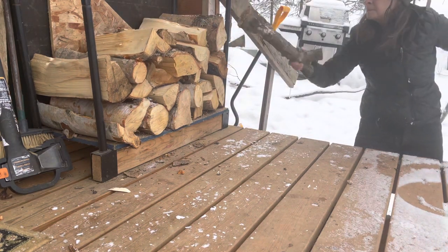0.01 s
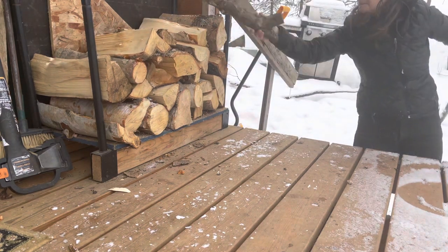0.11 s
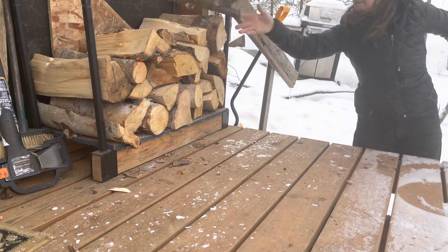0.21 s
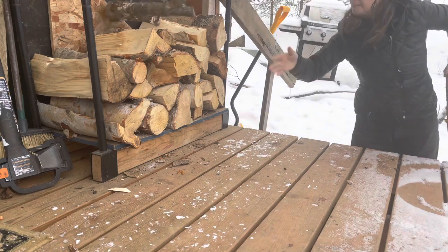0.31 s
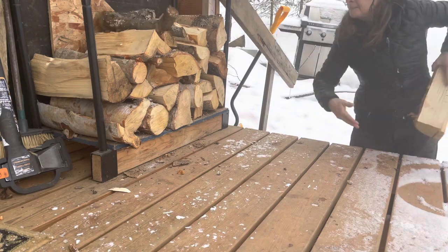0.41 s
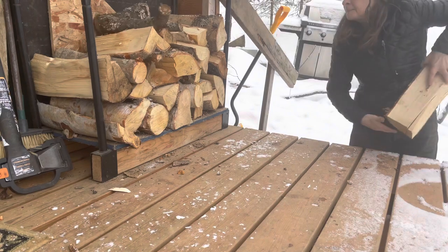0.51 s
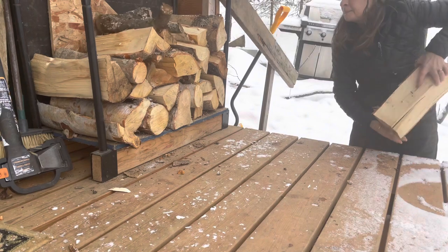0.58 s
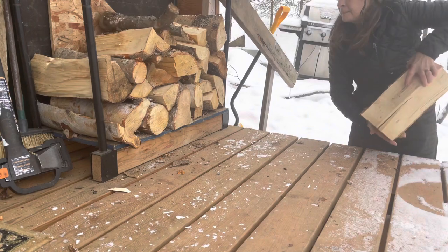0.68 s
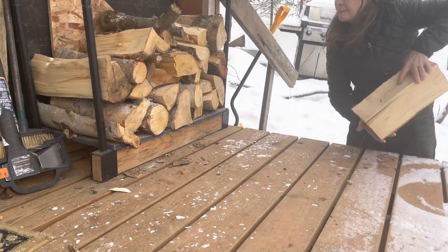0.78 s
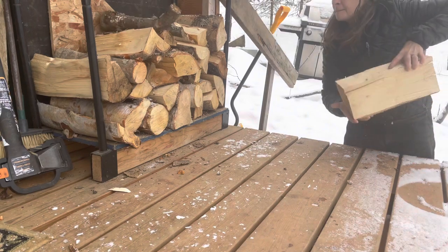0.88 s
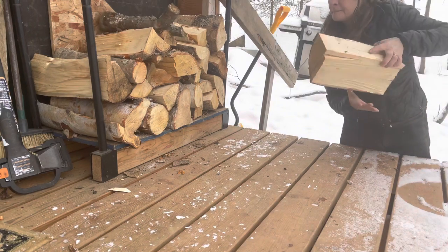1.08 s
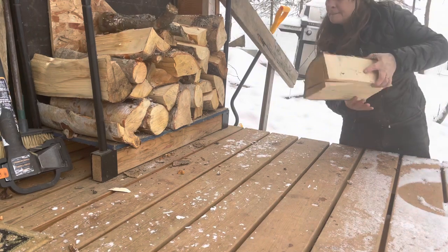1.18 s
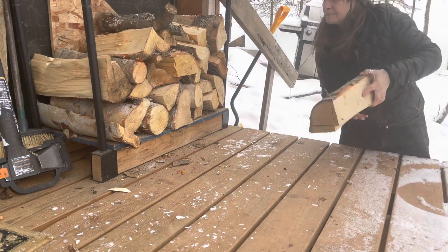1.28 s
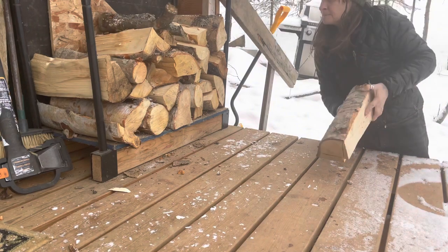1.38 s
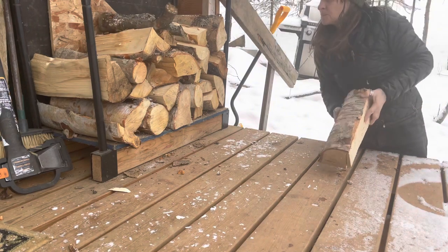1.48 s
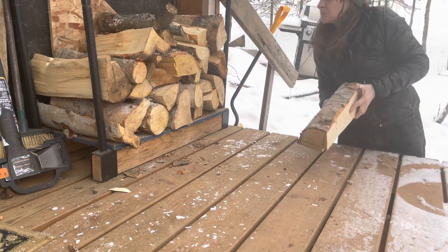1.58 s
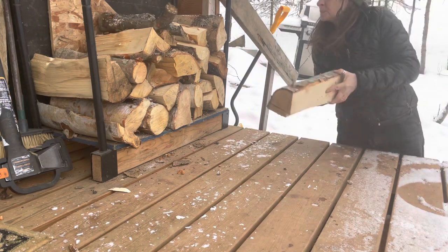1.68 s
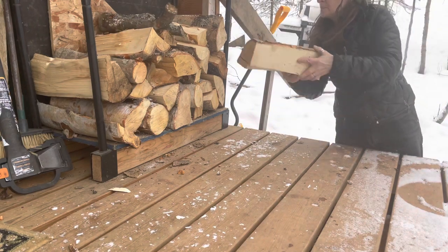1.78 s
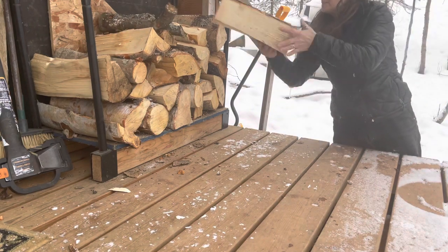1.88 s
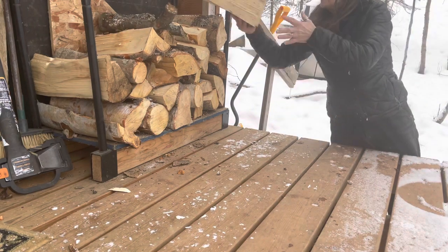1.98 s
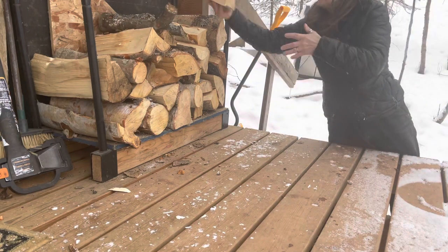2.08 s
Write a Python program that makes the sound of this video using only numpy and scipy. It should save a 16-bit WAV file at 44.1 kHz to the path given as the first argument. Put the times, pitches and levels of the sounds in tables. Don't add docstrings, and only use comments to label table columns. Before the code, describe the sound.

A tossed log grazes bark and lands on a firewood stack with a deep wooden knock, rocks with low booms and crumbs, then a split log slaps into a hand; jacket rustles, quiet snowy yard, close stereo microphone.

```python
import sys
import numpy as np
from scipy import signal
from scipy.fft import rfft, irfft
from scipy.io import wavfile
from scipy.ndimage import uniform_filter1d

SR = 44100
rng = np.random.default_rng(int(sys.argv[2]) if len(sys.argv) > 2 else 0)


def store_pcm(level_fs):
    pcm = np.round(np.clip(level_fs, -1, 1) * 32767).astype(np.int16)
    wavfile.write(sys.argv[1], SR, np.atleast_2d(pcm).T)


def rack_gain(trim_db):
    fader = np.asarray(trim_db, float)
    return 10 ** (fader / 20)


N = 92610
CLOCK = np.arange(N) / SR
LAND_S = 0.2046
SWELL_CYCLES = 0.77

# pitch_hz, density_db (dB per Hz)
SNAP_COLOUR = [(500, -8.5), (1400, -7), (2540, -9.5), (5000, -12), (8300, -8), (10000, -5.5),
               (11200, -21.5), (12600, -52)]


def evened(x):
    return x / np.sqrt(np.mean(x ** 2) + 1e-20)


def read(points, hz):
    f, value = np.transpose(points)
    return np.interp(np.log(hz + 1), np.log(f + 1), value)


def add(mix, s, sound):
    part = mix[round(s * SR):][:len(sound)]
    part += sound[:len(part)]


def bell(s, half_s):
    return np.exp(-.5 * ((CLOCK - s) / half_s) ** 2)


def noise(spectrum, size, patchy_db=0.):
    z = signal.stft(rng.standard_normal(size + 1024), nperseg=512)[2]
    patches = uniform_filter1d(rng.standard_normal(z.shape), size=8, axis=0)
    patches = evened(uniform_filter1d(patches, size=8, axis=1))
    colour_db = read(spectrum, np.fft.rfftfreq(512, 1 / SR))[:, None]
    z = z * rack_gain(colour_db + patchy_db * patches)
    return evened(signal.istft(z, nperseg=512)[1][512:512 + size])


def narrow(hz, wide):
    return [(hz / wide, -24), (hz, 0), (hz * wide, -24), (hz * wide ** 2, -60)]


def still_air(patchy_db=0.):
    # pitch_hz, density_db (dB per Hz)
    air_colour = [(15, -5), (25, -4.5), (87, -12), (125, -9), (336, -24), (448, -29), (1000, -34.5),
                  (11000, -67), (12500, -89), (16200, -105), (22000, -120)]
    return rack_gain(-59.5) * noise(air_colour, size=N, patchy_db=patchy_db)


def jacket():
    # centre_s, half_length_s, crisp_db, dull_db
    strokes = [(0.019, 0.021, -58, -68.5), (0.447, .15, -60.5, -68.5), (0.639, 0.035, -67, -68.5),
               (1.04, 0.045, -69.5, -73), (1.19, 0.081, -63, -81.5), (1.349, 0.1, -65.5, -60.5),
               (1.63, 0.0776, -70.5, -71.5), (1.73, 0.046, -67.5, -66.5), (1.824, 0.067, -63, -60),
               (1.961, 0.034, -68, -71), (2.038, .019, -50.5, -62), (2.1, 0.04, -69, -72)]
    # pitch_hz, density_db (dB per Hz)
    nylon_colour = [(900, -37.5), (2300, -5.5), (3500, -10), (5500, -13.5), (8500, -6.5), (10000, -2),
                    (10400, -14), (11200, 0), (12600, -36)]
    # pitch_hz, density_db (dB per Hz)
    cloth_colour = [(150, -31.5), (450, -1.5), (900, -3), (2200, -6), (3500, -18), (8000, -57)]
    # centre_s, half_length_s, level_db, pitch_hz
    whistles = [
        (.012, .014, -61, 1230),
        (.034, .016, -62, 2600),
        (2.031, .016, -57, 8800),
    ]
    rest_db = -73
    s, half_s, crisp_db, dull_db = np.transpose(strokes)[:, :, None]
    swell = bell(s, half_s)
    flicker = rack_gain(1.6 * evened(uniform_filter1d(rng.standard_normal(N), size=150)))
    crisp = rack_gain(rest_db) + (rack_gain(crisp_db) * swell).sum(0)
    dull = rack_gain(rest_db + 1.5) + (rack_gain(dull_db) * swell).sum(0)
    out = crisp * noise(nylon_colour, size=N, patchy_db=-0.4)
    out += dull * noise(cloth_colour, size=N, patchy_db=-3.5)
    out *= flicker
    for s, half_s, db, hz in whistles:
        out += rack_gain(db) * bell(s, half_s) * noise(narrow(hz, 1.2), size=N)
    return out


def ring(modes, spread_db, blow_ms, free=1., bouncing=False):
    hz, db, t60 = np.transpose(modes)[:, :, None]
    t = np.arange(SR // 3) / SR
    mix, tune = rng.uniform(-1, 1, (2, len(modes), 1))
    side = (-1. if bouncing else 1.) ** np.arange(len(modes))[:, None]
    fade = rack_gain(db * (0.7 + 0.62 * free) + spread_db * mix - 60 * t / (t60 * free))
    swell = 1 - np.exp(-t * hz / SWELL_CYCLES)
    tuned_hz = hz * (1 + 0.18 * (1 - free) * tune)
    body = (side * fade * swell * np.sin(2 * np.pi * tuned_hz * t)).sum(0)
    blow = np.hanning(int(blow_ms * SR / 1000) + 3)
    return np.convolve(body, blow / blow.sum())


def crack(db):
    t = np.arange(SR // 5) / SR
    fade = rack_gain(-60 * t / 0.015) + rack_gain(-22.5 - 60 * t / 0.013)
    return rack_gain(db) * noise(SNAP_COLOUR, size=len(t)) * fade


def knocks():
    # start_s, deck_db, log_db, crack_db, free_ring_share
    hits = [(.121, -55.5, -48, -68, 0.11), (0.1257, -56.5, -46, -72, 0.081), (0.137, -60.5, -48, -75, 0.1),
            (0.147, -58, -41, -78, 0.17), (0.1553, -49.5, -32, -55.5, 0.12), (0.162, -54.5, -41, -71, 0.1),
            (0.166, -55, -39.5, -76, 0.1), (0.1665, -55.5, -42.5, -72, 0.092),
            (0.1744, -53, -41, -74, 0.047), (0.198, -46.5, -43.5, -55, 0.31),
            (0.2041, -40.5, -35, -21, 0.22), (.2075, -39.5, -23, -15.5, 0.38),
            (0.2274, -36, -24, -58, 0.39), (.243, -39.5, -30.5, -57, 0.37), (.349, -41, -31.5, -60, 0.19),
            (0.3555, -63, -37.5, -67, 0.18), (.364, -35.5, -38, -72, .2), (.371, -43, -43, -50, 0.2),
            (.392, -50, -39, -69, 0.099), (.422, -43.5, -40, -63, .1), (0.6031, -39, -39, -65, 0.91)]
    # pitch_hz, level_db, t60_s
    deck_modes = [(136, 3.5, .09), (187.5, 0.5, 0.072), (225.3, 6, 0.042), (293.7, -1, 0.097),
                  (689.5, -6, 0.022)]
    # pitch_hz, level_db, t60_s
    log_modes = [(471.8, 3, 0.19), (588, 4.5, 0.12), (816, -0.5, 0.049), (1100, -5.5, .05), (1252, 1, 0.17),
                 (1499, -23, .06), (2280, -24.5, .06)]
    out, blow_ms = np.zeros(N), 0.82
    for s, deck_db, log_db, crack_db, free in hits:
        add(out, s, rack_gain(deck_db) * ring(deck_modes, 1.3, blow_ms, 0.92))
        log = ring(log_modes, 2.0 * (1 - free), blow_ms, min(free, 1), free > .7)
        add(out, s, rack_gain(log_db) * log)
        add(out, s, crack(crack_db))
    return out


def bark():
    # start_s, rise_s, fall_t60_s, crisp_db, woody_db
    scrapes = [
        (0.126, 0.0023, 0.12, -70, -55.5),
        (.158, 0.0021, 0.088, -62, -37),
        (0.225, 0.012, 0.13, -49, -29),
        (.257, 0.0048, .1, -43, -39.5),
        (.293, 0.0037, 0.02, -51.5, -56),
        (0.35, 0.0048, 0.28, -58, -47.5),
        (0.37, 0.0083, 0.17, -50, -76),
        (0.476, 0.025, 0.15, -58.5, -77),
        (0.815, 0.011, 0.14, -56, -73),
    ]
    s, rise_s, t60, crisp_db, woody_db = np.transpose(scrapes)[:, :, None]
    shape = np.where(CLOCK < s, bell(s, rise_s), rack_gain(-60 * abs(CLOCK - s) / t60))
    grains = rng.random(N) < 1800 / SR
    grit = rack_gain(3.5 * rng.exponential(1, N)) * grains
    grit = .4 + evened(uniform_filter1d(grit, size=30))
    crisp = (rack_gain(crisp_db) * shape).sum(0) * grit * noise(SNAP_COLOUR, size=N)
    return crisp + (rack_gain(woody_db) * shape).sum(0) * noise(narrow(590, 3.6), size=N)


def landing():
    # pitch_hz, level_db, t60_s, arrival_ms
    bending_modes = [(960, 0.5, 0.014, 0.12), (2461, -18.5, 0.019, 0), (614, -16, 0.09, 1.5),
                     (570, -17, 0.059, 5), (424, -10.5, .06, 3), (340, 0, 0.035, 1.4), (270, 0, 0.04, 3.5),
                     (187, -1, .065, 5.9), (129, 0, 0.075, 3.3), (98.5, -12, 0.3, 10.5),
                     (52.6, -9.5, 0.25, 12.5), (1269, -25, 0.098, 6), (1172, -26.5, .07, 4),
                     (707, -19, 0.05, 2)]
    hz, db, t60, ms = np.transpose(bending_modes)[:, :, None]
    t = np.maximum(CLOCK - LAND_S - ms / 1000, 0)
    swell = 1 - np.exp(-t * hz / SWELL_CYCLES)
    return -(rack_gain(db - 60 * t / t60) * swell * np.sin(2 * np.pi * hz * t)).sum(0)


def rumble():
    # pitch_hz, density_db (dB per Hz)
    rumble_colour = [(40, -19), (150, 4), (260, -11), (500, -19), (1500, -44)]
    since_s = CLOCK - LAND_S
    shaking = np.clip(since_s / .02, 0, 1) * np.clip((.58 - CLOCK) / 0.026, 0, 1)
    return shaking * rack_gain(-33 - 60 * since_s / 0.96) * noise(rumble_colour, size=N, patchy_db=2.0)


def rocking():
    # centre_s, half_length_s, level_db, pitch_hz, glide_hz_per_s
    booms = [(0.333, 0.012, -29.5, 56.5, 101), (.345, .012, -39.5, 165, -6),
             (0.394, 0.019, -31.5, 97.3, -47), (0.418, 0.027, -34.5, 65, 1),
             (0.453, 0.025, -49, 226.6, 103), (.535, .02, -53, 185, 3), (0.466, 0.046, -39, 52.3, 71),
             (.49, 0.021, -47, 136, 7), (0.523, 0.025, -36, 78.6, 252), (0.556, 0.014, -45, 113, 0),
             (0.645, 0.031, -47, 71.5, -100), (0.689, 0.019, -53, 127.4, 4), (0.796, 0.021, -59, 102, 0.5),
             (0.889, 0.029, -57, 53.7, 0)]
    out = np.zeros(N)
    for s, half_s, db, hz, glide in booms:
        t = CLOCK - s
        cycles = hz * t + .5 * glide * t ** 2 + rng.random()
        out += rack_gain(db) * bell(s, half_s) * np.sin(2 * np.pi * cycles)
    return out


def hands():
    # start_s, ring_db, crack_db
    catch = [
        (.7805, -40.5, -43.5),
        (.7825, -45, -50.5),
        (.7832, -25.5, -42.5),
        (.794, -38, -47.5),
        (.811, -43, -67),
        (.817, -45.5, -58),
        (.829, -51, -61),
    ]
    # pitch_hz, level_db, t60_s
    slap_modes = [(1800, 0, 0.016), (1960, 0, 0.014), (2105, -3.5, 0.015), (2440, -5.5, 0.022),
                  (2720, -7, 0.022), (3100, -7, .02), (3600, -14, .015), (4180, -13, .012),
                  (264, -15, 0.056), (450, -16, 0.051), (783, -13.5, 0.03), (1013, -7.5, 0.016),
                  (1336, -10.5, 0.0085)]
    # start_s, ring_db, crack_db
    turns = [
        (1.153, -50, -71),
        (1.163, -48, -76),
        (1.212, -69, -66),
        (1.2275, -33.5, -61),
    ]
    # pitch_hz, level_db, t60_s
    turn_modes = [(313, -3.5, 0.042), (552, 6.5, 0.018), (750, 3.5, 0.017), (1220, -9, 0.023),
                  (2010, -13, .03)]
    # start_s, level_db, pitch_hz
    ticks = [
        (.4765, -50, 7500),
        (.5652, -40, 10300),
        (.7826, -42, 11000),
        (1.9928, -42, 8200),
    ]
    out, t = np.zeros(N), np.arange(400) / SR
    for touches, modes, free in ((catch, slap_modes, .9), (turns, turn_modes, .66)):
        for s, ring_db, crack_db in touches:
            add(out, s, rack_gain(ring_db) * ring(modes, 2.7, .12, free))
            add(out, s, crack(crack_db))
    for s, db, hz in ticks:
        add(out, s, rack_gain(db - 60 * t / .012) * noise(narrow(hz, 1.4), size=400))
    return out


def yard(x):
    t = np.arange(SR // 3) / SR
    taps = np.zeros(len(t))
    at = np.arange(150, SR // 3 - 22, 22)
    taps[at + rng.integers(0, 22, len(at))] = rng.choice([-1., 1.], len(at))
    bass_cut = signal.butter(1, 300, "high", fs=SR)
    taps = signal.lfilter(*bass_cut, taps * rack_gain(-60 * t / 0.14))
    return rack_gain(-11.5) * signal.fftconvolve(x, taps / np.linalg.norm(taps))[:N]


def ports(x, other, lean):
    # pitch_hz, left_lead_radians
    phase_lead = [(60, .05), (430, .25), (1720, .8), (2900, 1.2), (4000, .3), (6900, .3), (7800, 1.1),
                  (8870, -.4), (9820, -2.6), (10900, -3.7), (11400, -6.3), (12200, -6.6)]
    # pitch_hz, likeness (0 to 1)
    likeness = [(60, 0.99), (270, 0.78), (1240, 0.44), (12000, 0.13)]
    hz = np.fft.rfftfreq(N, 1 / SR)
    half = np.exp(.5j * read(phase_lead, hz)) * rack_gain(.5 * read(lean, hz))
    same = np.clip(read(likeness, hz), 0, 1)
    apart = np.sqrt((1 - same) / 2) * rfft(other)
    return irfft(np.array([(rfft(x) + apart) * half, (rfft(x) - apart) / half]), N)


def scene():
    # pitch_hz, left_minus_right_db
    stack_lean = [(100, 1.5), (400, 3), (800, 7), (2500, 7), (4500, 1.5), (12000, .2)]
    # pitch_hz, left_minus_right_db
    near_lean = [(60, 1.2), (12000, 2.2)]
    stack = knocks() + bark() + landing() + rumble() + rocking()
    hand = hands()
    near = hand + yard(hand) + jacket() + still_air(-1.25)
    far_sides = ports(stack + yard(stack), 1.7 * yard(stack), stack_lean)
    return far_sides + ports(near, jacket() + still_air(), near_lean)


def top_cut(x):
    return signal.sosfilt(signal.butter(12, 12620, fs=SR, output="sos"), x)


def record(dry):
    # from_hz, to_hz, dropped_share of the time
    starved_bands = [(10250, 10500, .75), (10500, 11000, .3), (11000, 11400, .45), (11400, 11900, .75),
                     (11900, 13000, .92)]
    x = signal.sosfilt(signal.butter(3, 42.26, "high", fs=SR, output="sos"), dry)
    hz, t, z = signal.stft(.95 * np.tanh(x / .78), SR, nperseg=2048)
    kept = np.ones(z.shape[1:])
    for lo, hi, share in starved_bands:
        band = (hz >= lo) & (hz < hi)
        power = (abs(z[:, band]) ** 2).sum((0, 1)) * rack_gain(0.94 * rng.standard_normal(len(t)))
        kept[band] = power > np.quantile(power, share)
    mix = signal.istft(z * kept, SR, nperseg=2048)[1][:, :N]
    return top_cut(mix)


dry = scene()
out = record(dry)
store_pcm(out)
```